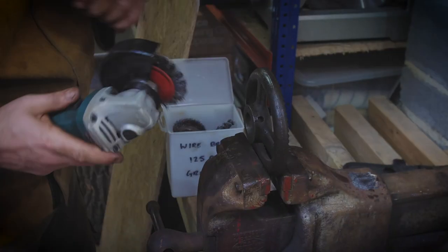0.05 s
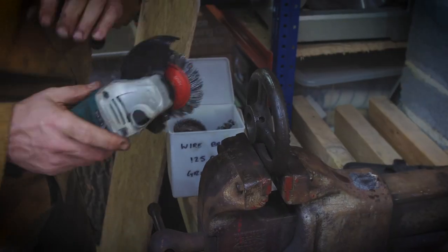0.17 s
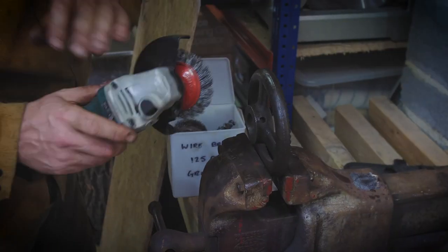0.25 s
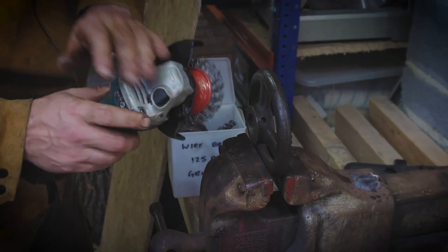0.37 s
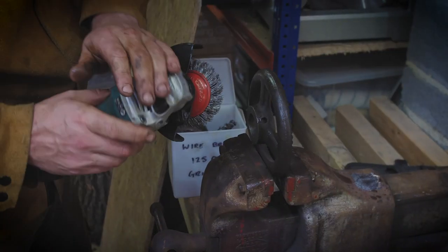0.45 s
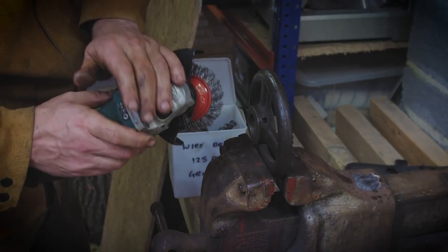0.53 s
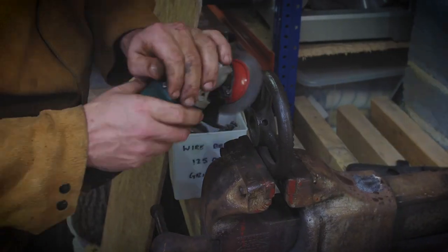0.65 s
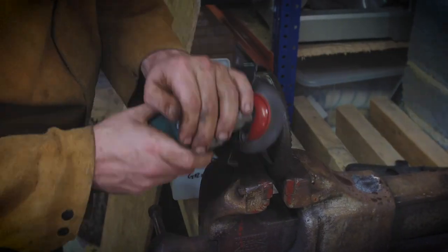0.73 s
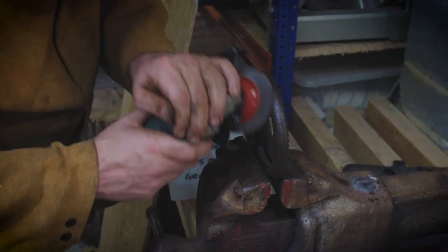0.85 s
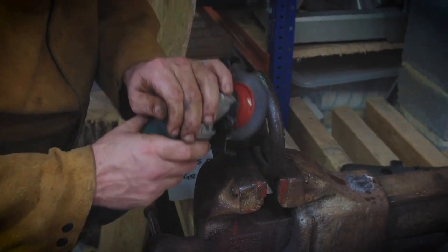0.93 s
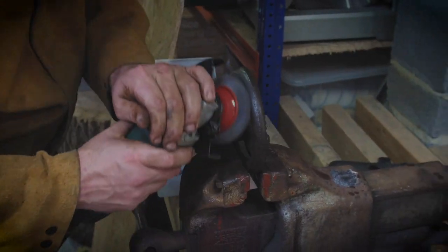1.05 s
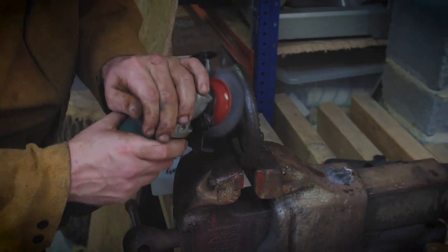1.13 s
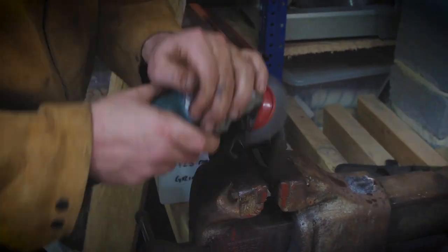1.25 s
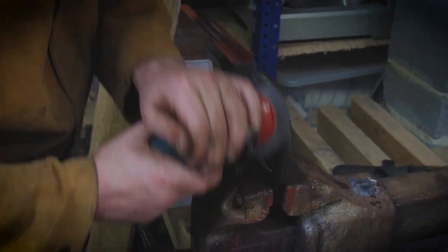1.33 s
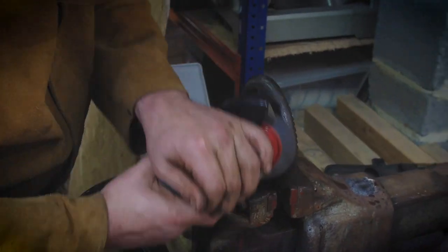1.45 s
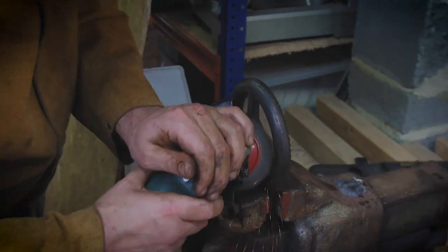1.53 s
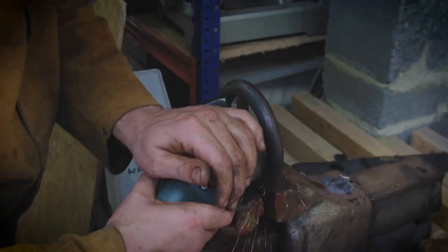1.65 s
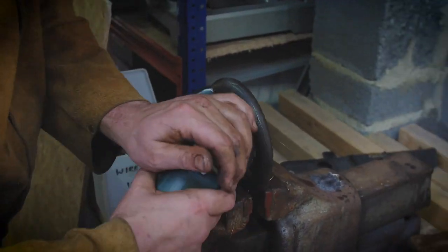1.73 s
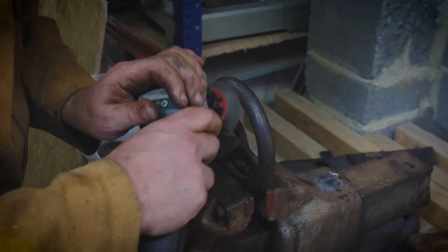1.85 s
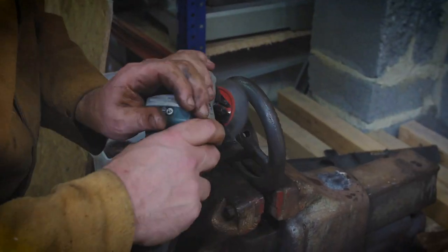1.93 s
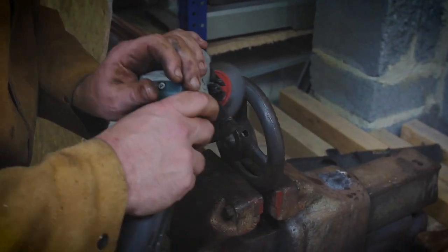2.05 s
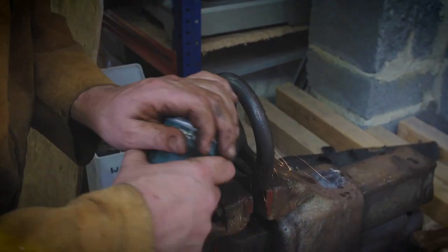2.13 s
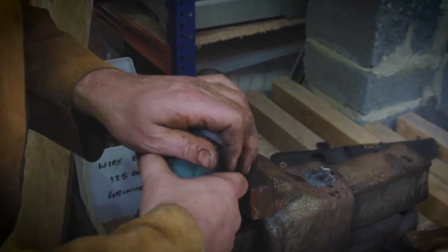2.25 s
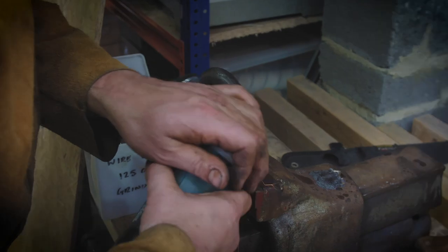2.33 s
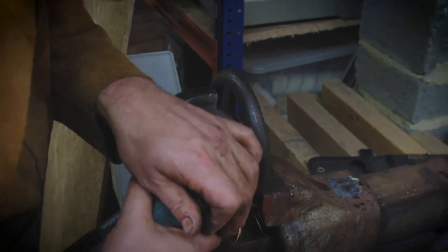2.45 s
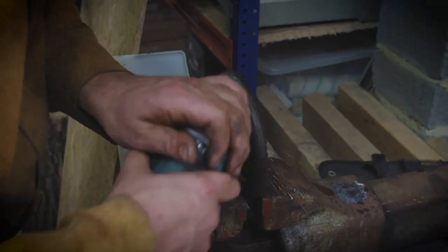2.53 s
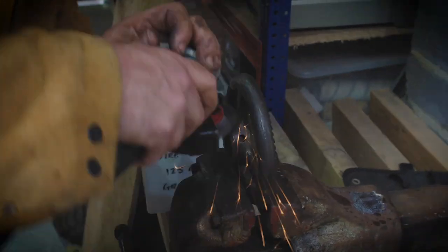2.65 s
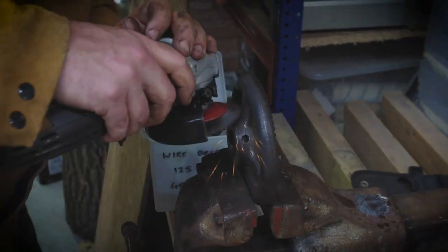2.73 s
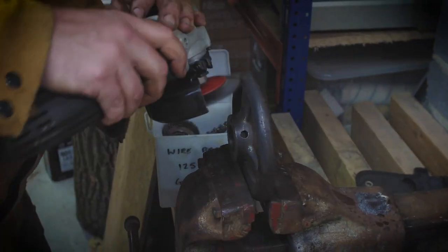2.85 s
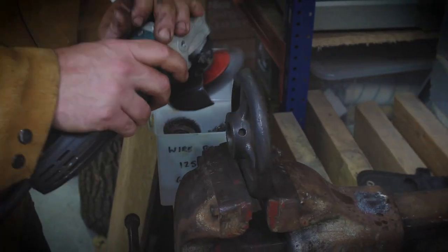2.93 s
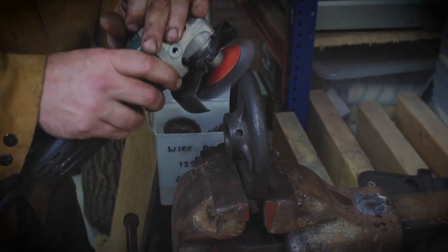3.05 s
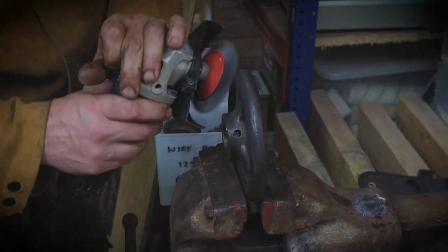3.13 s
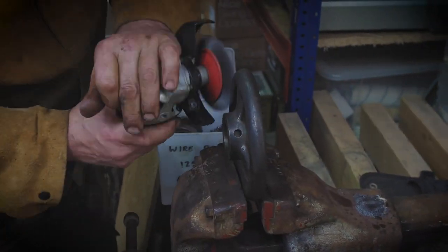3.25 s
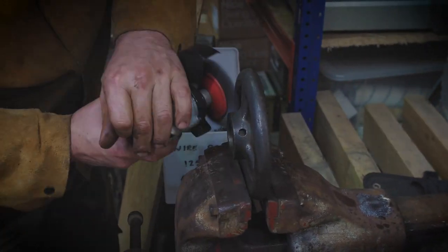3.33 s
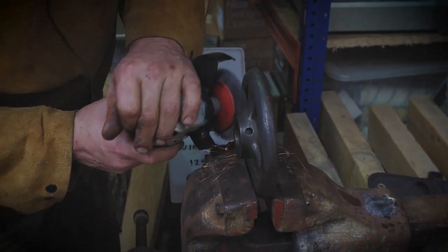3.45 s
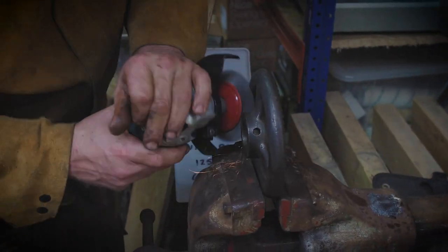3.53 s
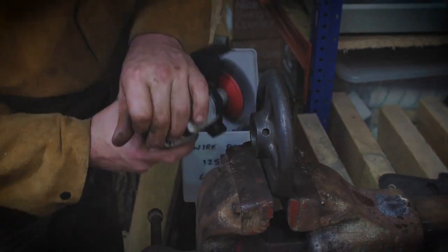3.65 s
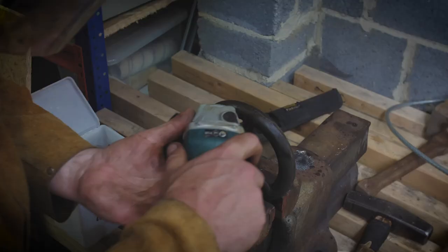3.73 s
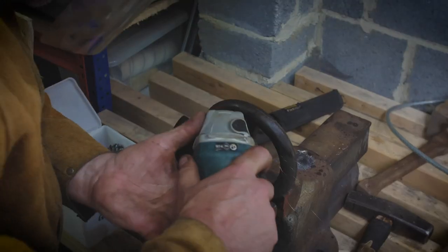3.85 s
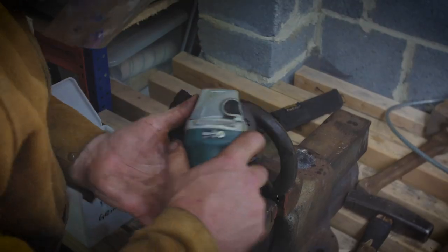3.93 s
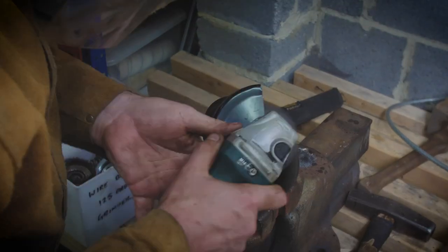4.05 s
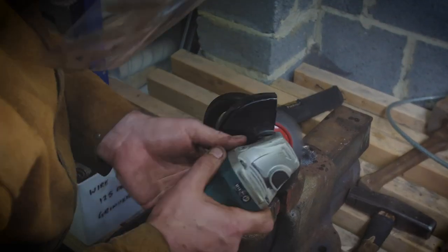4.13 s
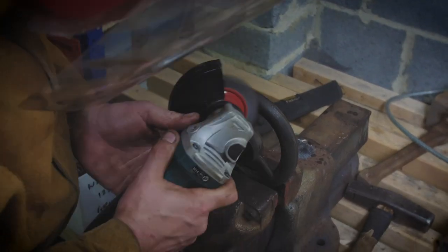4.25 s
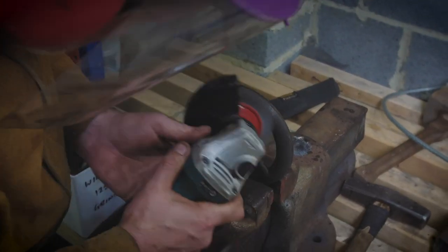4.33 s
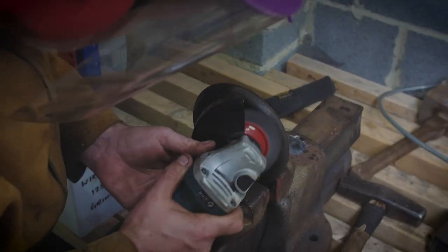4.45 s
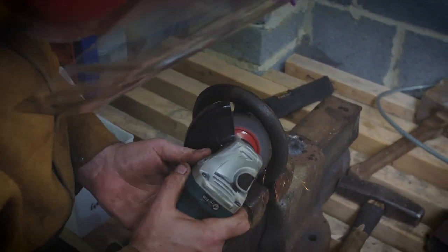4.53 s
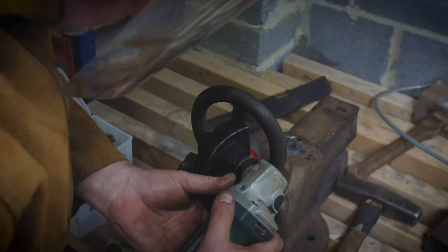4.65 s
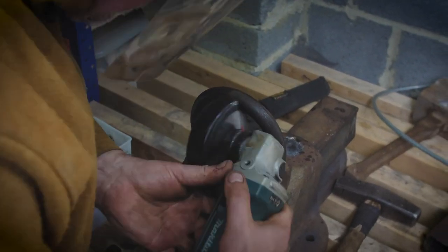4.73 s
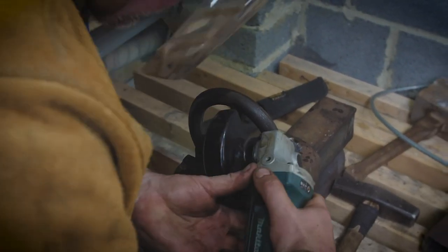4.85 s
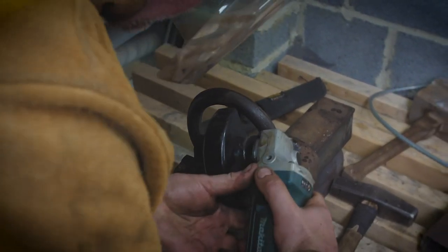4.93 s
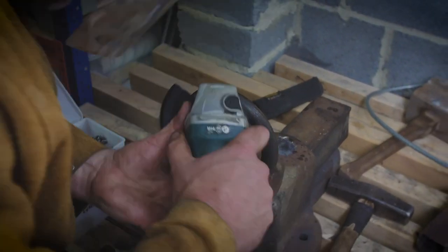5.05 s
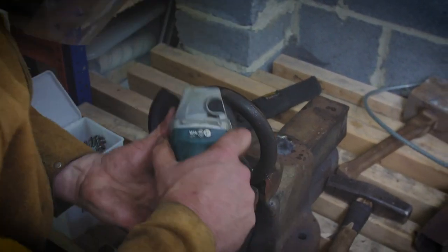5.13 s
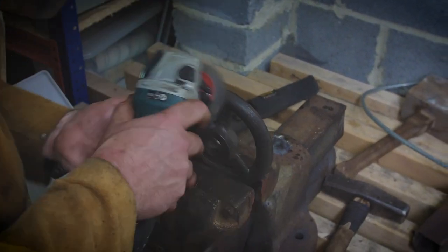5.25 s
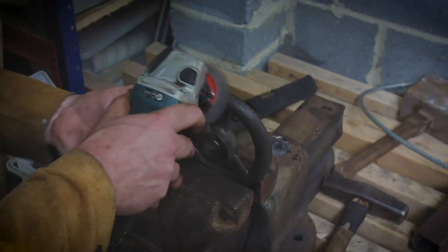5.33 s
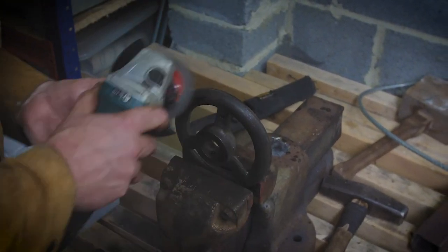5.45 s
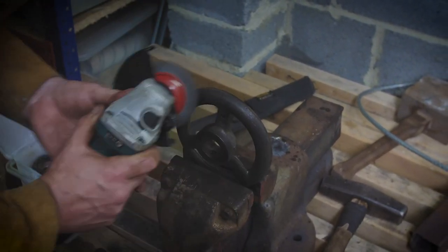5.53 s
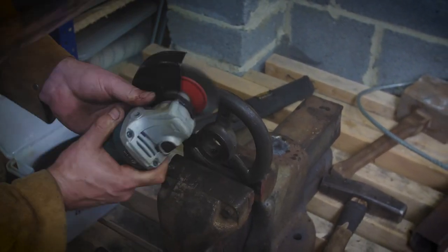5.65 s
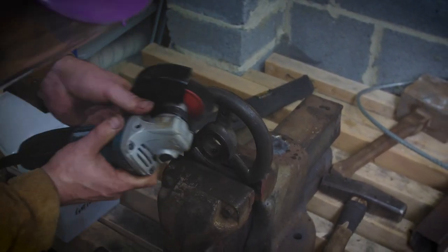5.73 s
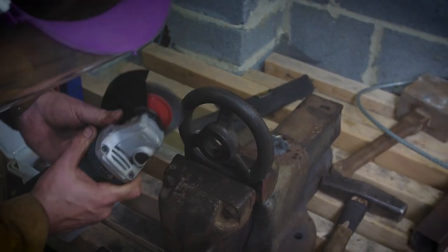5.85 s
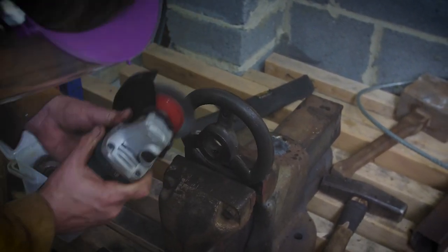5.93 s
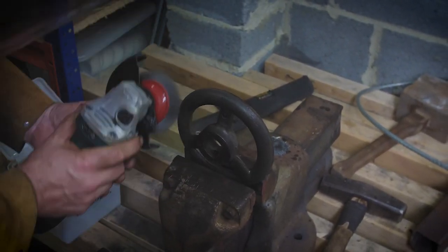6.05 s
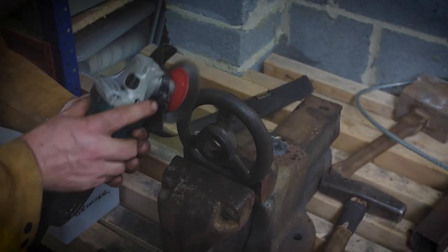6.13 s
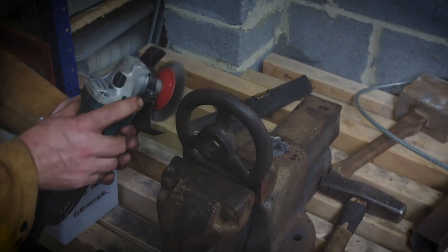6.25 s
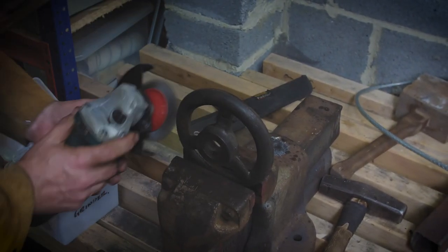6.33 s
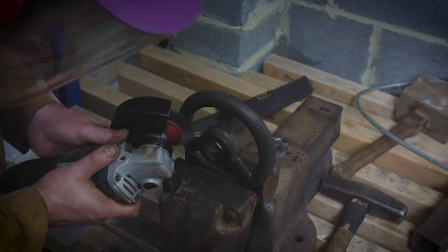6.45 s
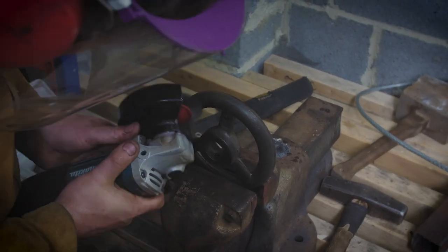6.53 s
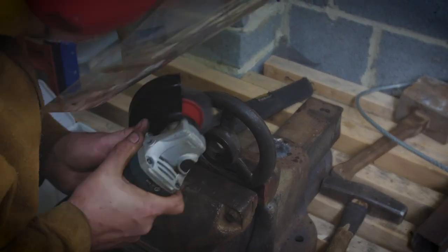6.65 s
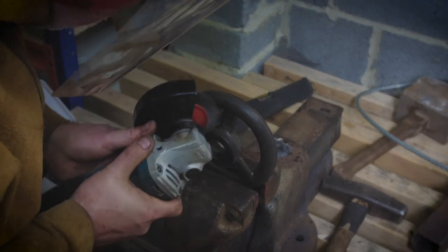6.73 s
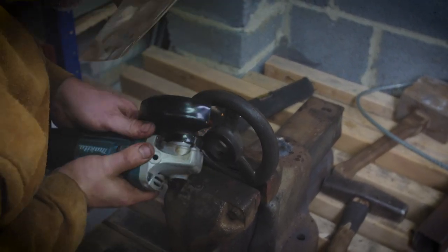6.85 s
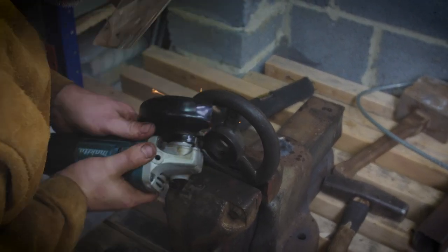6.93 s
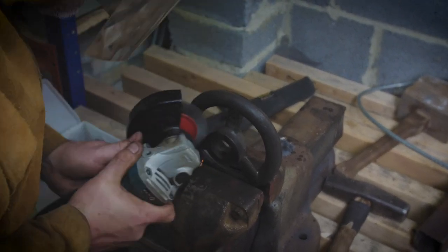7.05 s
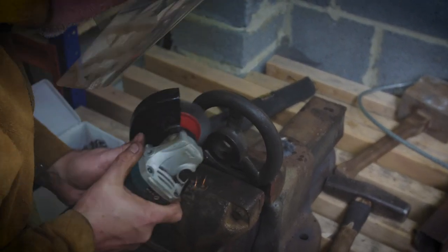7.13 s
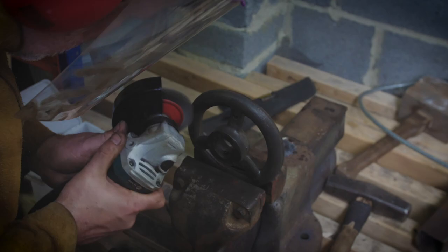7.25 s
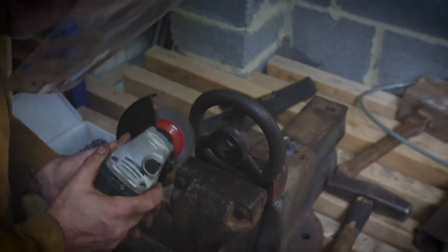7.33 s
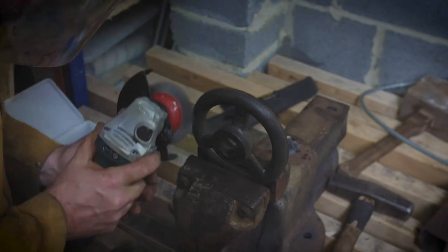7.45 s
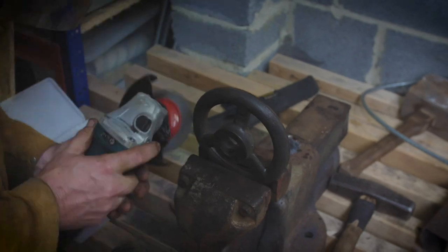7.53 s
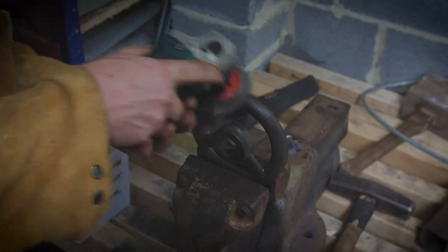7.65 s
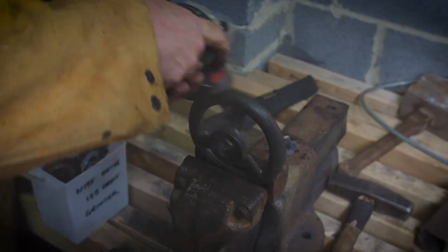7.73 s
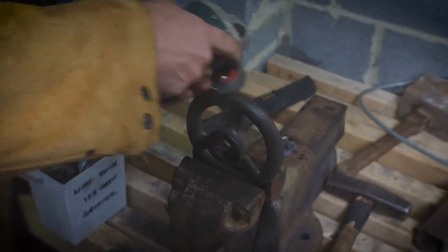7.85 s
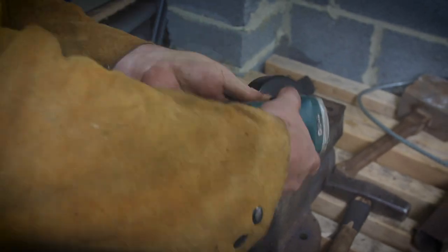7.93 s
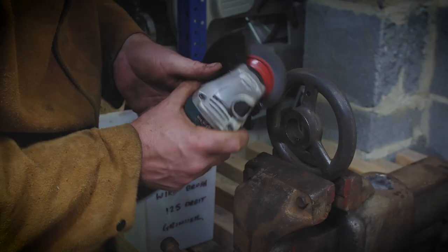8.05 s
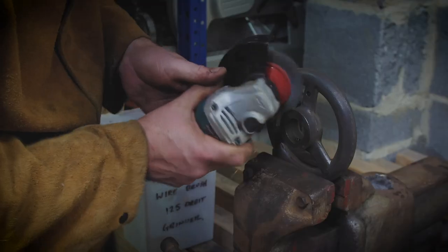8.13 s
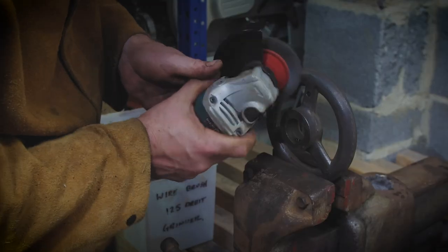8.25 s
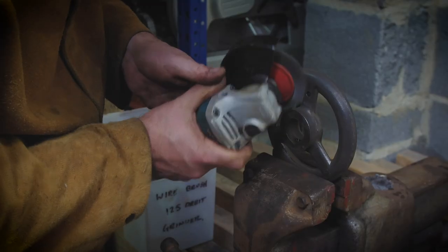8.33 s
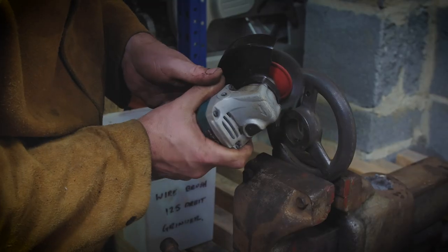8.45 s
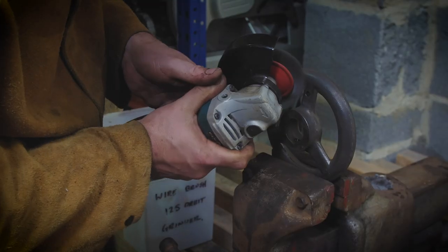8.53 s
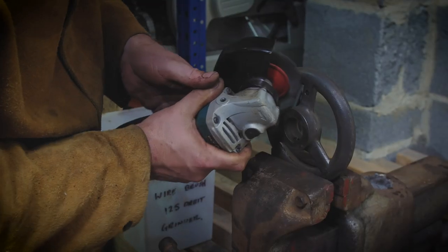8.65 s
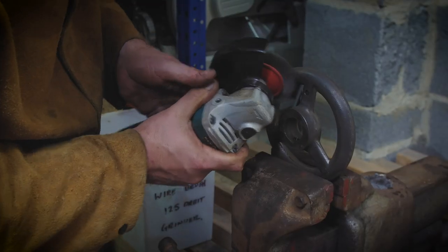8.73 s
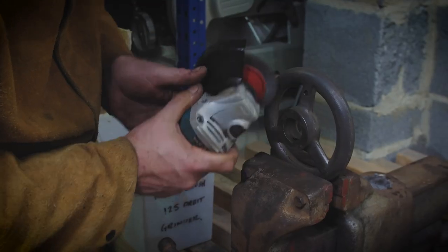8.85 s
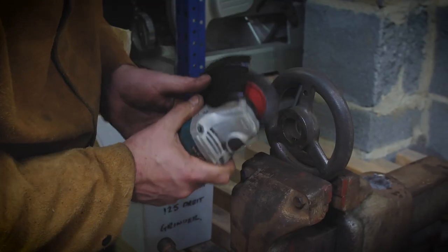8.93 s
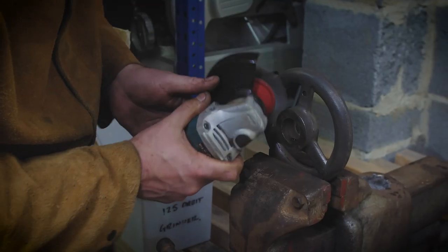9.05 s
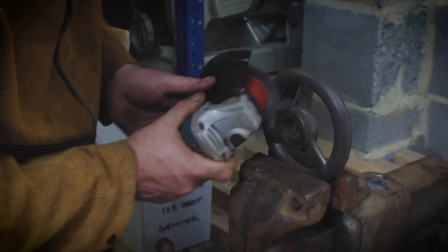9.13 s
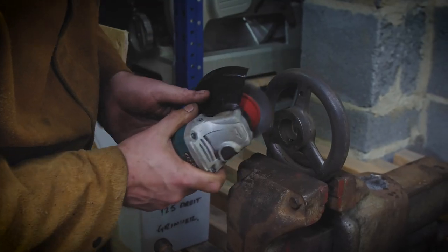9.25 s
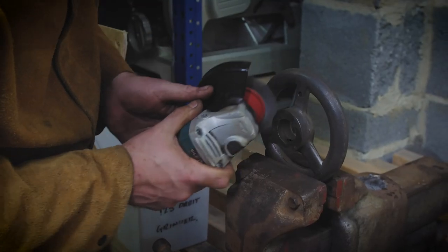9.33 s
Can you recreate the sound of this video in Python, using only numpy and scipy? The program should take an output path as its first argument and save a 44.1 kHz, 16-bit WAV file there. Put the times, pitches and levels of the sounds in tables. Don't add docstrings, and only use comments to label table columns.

```python
import sys
import numpy as np
from scipy import signal
from scipy.fft import rfft, irfft, next_fast_len
from scipy.io import wavfile
from scipy.ndimage import uniform_filter1d, map_coordinates

SR = 44100
rng = np.random.default_rng(int(sys.argv[2]) if len(sys.argv) > 2 else 0)


def boost(x):
    u = np.asarray(x, float) / 20
    return 10 ** u


def unload_wav(signal):
    wavfile.write(
        sys.argv[1],
        SR,
        np.round(np.clip(np.atleast_2d(signal).T, -1, 1) * 32767).astype(np.int16),
    )


N = 413658
T = np.arange(N) / SR
CUT_IN, START, CUT_OUT = .639, .682, 8.1187


def unit(x):
    return x / np.sqrt(np.mean(x ** 2) + 1e-20)


def curves(rows):
    s, *cols = np.transpose(rows)
    return [np.interp(T, s, c) for c in cols]


def wobble(rate):
    return map_coordinates(rng.standard_normal(int(N * rate / SR) + 4), [T * rate])


def coloured(x, points, lo_hz=0, hi_hz=SR):
    size = next_fast_len(N + 8192)
    hz = np.fft.rfftfreq(size, 1 / SR) + 1
    point_hz, point_db = np.transpose(points)
    gain = boost(np.interp(np.log(hz), np.log(point_hz), point_db))
    band = 1 / np.sqrt((1 + (lo_hz / hz) ** 16) * (1 + (hz / hi_hz) ** 16))
    return unit(irfft(rfft(x, size) * gain * band, size)[:N])


def patchy(depth_db, size):
    z = signal.stft(rng.standard_normal(N + 512), nperseg=256)[2]

    def field(frames):
        neighbours = uniform_filter1d(rng.standard_normal(z.shape), 2, 0)
        return unit(uniform_filter1d(neighbours, frames, 1))

    patches = field(size) + 1.2 * field(12 * size)
    return signal.istft(z * boost(depth_db * patches), nperseg=256)[1][:N]


def room_and_sleeve():
    # start_s, sleeve_rub_db, room_hiss_db
    quiet = [
        (0, -62.5, -62),
        (.18, -62, -61),
        (.27, -51.5, -59.5),
        (.44, -56.5, -62.5),
        (.49, -66, -67),
        (.635, -68, -69),
    ]
    cloth = [(18, -61), (30, -38), (113, -6), (312, -4), (432, -8), (662, -8), (1500, -24), (1950, -66),
             (3300, -120)]
    air = [(410, -38), (700, -12), (1180, -1), (3900, -2), (5520, -18), (12700, -23), (15000, -35)]
    rub_db, hiss_db = curves(quiet)
    uneven = boost(1.6 * wobble(38.7)) * rng.standard_normal(N)
    rub = boost(rub_db) * coloured(uneven, cloth)
    hiss = boost(hiss_db) * coloured(patchy(1, size=10), air, hi_hz=12000)
    return rub + hiss


def guard_ticks():
    # start_s, peak_db, bright_db (per octave about 3300 Hz)
    ticks = [
        (0.036, -36.5, -11),
        (0.0836, -29, 9),
        (0.09, -31.5, -3),
        (.1, -37, 0),
        (.147, -29, 16),
        (.278, -36, -1),
    ]
    # pitch_hz, level_db, t60_s (time to fade by 60 dB)
    guard = [
        (1280, -11, 0.027),
        (2200, -0.5, 0.023),
        (3300, 2.5, 0.015),
        (5200, -20, .015),
    ]
    scrape = coloured(rng.standard_normal(N), [(400, -22), (1200, -15), (3000, 7), (5000, -8), (10000, -29)])
    out = np.zeros(N)
    for start_s, peak_db, bright_db in ticks:
        age = np.maximum(T - start_s, 0)
        ring = np.zeros(N)
        for hz, level_db, t60 in guard:
            tilt_db = bright_db * np.log2(hz / 3300)
            tone = np.sin(2 * np.pi * hz * age + 0.6 * wobble(300))
            ring += boost(level_db + tilt_db - 60 * age / t60) * tone
        out += (age > 0) * boost(peak_db - 9.5) * (ring + 0.61 * boost(-60 * age / 0.038) * scrape)
    return out


def creak():
    # start_s, pitch_hz, level_db
    slips = [
        (.27, 700, -85),
        (.3, 699, -62),
        (.37, 700, -58),
        (.39, 447, -58),
        (.45, 432, -57),
        (.49, 420, -85),
    ]
    pitch_hz, level_db = curves(slips)
    turns = 2 * np.pi * np.cumsum(pitch_hz) / SR
    return boost(level_db + 4 * wobble(41.8)) * np.sin(turns + wobble(60))


def handling():
    moves = room_and_sleeve() + creak() + guard_ticks()
    faint = boost(-78) * coloured(rng.standard_normal(N), [(300, -26), (1500, -2), (12000, -13)])
    return moves * (T < CUT_IN) + faint * (T < START)


def bursts(rows, rise, t60):
    start_s, peak_db = np.transpose(rows)
    age = T - start_s[:, None]
    shape = (age > 0) * (1 - np.exp(-abs(age) / rise)) * boost(-60 * abs(age) / t60)
    return boost(peak_db) @ shape


def switch_clicks():
    # start_s, peak_db
    snaps = [
        (.655, -68),
        (.6605, -59),
        (.678, -41),
    ]
    noise = coloured(rng.standard_normal(N), [(300, -20), (3000, 0), (12000, -4)])
    return bursts(snaps, rise=.0003, t60=0.025) * noise


def grinder(wheel_hz, levels_db, parts, rasp, colour, edges_hz, shake, pace, flicker_db, beat, grit_db, patch_db,
            size):
    wheel_hz = wheel_hz * (1 + shake * (wobble(pace) + .6 * wobble(2 * pace)))
    turns = 2 * np.pi * np.cumsum(wheel_hz) / SR
    out = np.zeros(N)
    for part, level_db in zip(parts, levels_db):
        together = wobble(pace)
        for order, db in part:
            audible = order * wheel_hz < .48 * SR
            depth_db = flicker_db * np.clip(order / 10, .68, 1)
            beads = depth_db * (together + .5 * wobble(pace / 2) + .8 * wobble(2 * pace))
            sway = rng.uniform(0, 2 * np.pi) + .5 * wobble(2 * pace)
            out += audible * boost(level_db + db + 3.5 + beads) * np.sin(order * turns + sway)
    tremor_db = 0.27 * wobble(20) + 0.42 * wobble(60)
    contact = unit(boost(tremor_db + grit_db * wobble(3000)) * (1 + beat * np.cos(turns)))
    for level_db, lo_hz, hi_hz in zip(curves(rasp), edges_hz, edges_hz[1:]):
        wires = coloured(contact * patchy(patch_db, size), colour, lo_hz, hi_hz)
        out += boost(level_db + 0.53 * wobble(25)) * wires
    return out


def hurried_grinder():
    # start_s, wheel_turns_hz
    speed = [(0.68, 377.5), (0.72, 536), (0.77, 752), (0.802, 803), (0.829, 839.2), (0.965, 861),
             (1.128, 863.5), (1.245, 855), (1.292, 820.3), (1.321, 802), (1.36, 832), (1.455, 830),
             (1.618, 873), (1.738, 826), (1.781, 763), (1.863, 679), (1.945, 752), (2.01, 839),
             (2.108, 802), (2.143, 792), (2.217, 867), (2.271, 809.8), (2.434, 783), (2.598, 786),
             (2.761, 798), (2.924, 767), (2.968, 835), (3.087, 821), (3.131, 774), (3.251, 784.8),
             (3.414, 785), (3.517, 807), (3.577, 777), (3.648, 738), (3.694, 746.4), (3.741, 820),
             (3.765, 850.1), (3.814, 773), (3.904, 765), (3.956, 725), (3.999, 782.7), (4.067, 816),
             (4.195, 760), (4.23, 784), (4.271, 739), (4.394, 752.6), (4.557, 814.8), (4.72, 814),
             (4.772, 754.7), (4.883, 772), (4.905, 735.5), (5.047, 711), (5.177, 770), (5.21, 758),
             (5.273, 792.2), (5.373, 709), (5.536, 705), (5.7, 699.5), (5.863, 683), (6.026, 693),
             (6.19, 723.5), (6.353, 713), (6.402, 724), (6.451, 808), (6.516, 840), (6.595, 720),
             (6.679, 662), (6.723, 604), (6.785, 653), (6.843, 639), (6.889, 684), (7.006, 660.9),
             (7.09, 654), (7.131, 703), (7.169, 668), (7.332, 736), (7.425, 823), (7.496, 786),
             (7.659, 777), (7.724, 745), (7.773, 820), (7.822, 779.2), (7.877, 812.1), (7.985, 757),
             (8.034, 800), (8.064, 766), (8.116, 745)]
    # start_s, unbalance_db, oval_db, third_order_db, armature_db, guard_edge_db, cooling_fan_db, knots_db
    levels = [(0.69, -91, -80, -58, -57, -60.0, -57, -55), (0.76, -64, -49, -50, -43, -57.0, -36, -56),
              (0.85, -54.0, -61, -52, -50, -63, -36, -38), (1.01, -53, -54, -50.0, -49, -60, -38, -40.0),
              (1.18, -46, -50.0, -46.5, -52.0, -58, -33, -39.0), (1.34, -65, -55, -53, -48, -62, -39, -37),
              (1.51, -54.5, -52.5, -46.5, -50, -57, -38, -45), (1.67, -55, -52, -59, -47, -59, -32, -36),
              (1.84, -62.5, -64, -44.5, -49, -50.0, -49, -48), (2.0, -49, -52.5, -48, -45, -56, -38, -54),
              (2.17, -56.5, -60, -54.0, -46.5, -64, -32, -41),
              (2.33, -57.0, -61, -51.5, -46, -64, -44, -60), (2.5, -62, -56, -45.5, -45.5, -47.5, -46, -35),
              (2.66, -52, -57, -45, -47, -49, -38, -37), (2.83, -59.5, -63, -51.5, -49, -57.0, -42, -44),
              (2.99, -52.5, -56.0, -48, -50, -57, -36, -43), (3.16, -60, -62, -45, -62, -61, -44, -40.5),
              (3.32, -51, -51, -56, -51, -53, -44, -33.5), (3.49, -57.0, -49.5, -50, -48.5, -58, -61, -34),
              (3.65, -57, -52, -57, -51, -56, -43, -39.0), (3.82, -63, -50, -54, -43, -44, -39, -40.0),
              (3.98, -59.5, -76, -58, -47, -47, -35.5, -53),
              (4.15, -54, -54, -53, -44.5, -51, -47.0, -49.0), (4.31, -63, -68, -49, -50, -48, -51, -46),
              (4.48, -58, -61, -48.5, -46, -44, -46, -48), (4.64, -55.5, -56.0, -56, -48, -50, -40, -40),
              (4.81, -55, -59, -53, -48.5, -46, -45, -35), (4.97, -61.5, -65, -54, -45, -68, -39.0, -44.5),
              (5.14, -62, -67.0, -50, -54, -50.0, -45, -51), (5.3, -59, -68.5, -47, -43, -47, -54, -39.0),
              (5.47, -58, -54, -48, -63, -61.0, -64, -35), (5.63, -62, -68, -57.0, -58, -53, -61, -37),
              (5.8, -52.5, -58, -57, -47.5, -60.5, -39, -41.5),
              (5.96, -53.0, -58, -64, -55.5, -38.5, -51.0, -41), (6.13, -59, -69, -58, -54, -44, -54, -39),
              (6.29, -69, -61, -61, -63, -60, -49, -40), (6.46, -54.0, -65.0, -59, -54.0, -46, -49.0, -39),
              (6.62, -58.5, -51, -45.5, -49.0, -43, -42, -40),
              (6.79, -54.5, -64, -52, -55, -47, -40.0, -43),
              (6.95, -59, -59.0, -52.0, -57, -53, -42, -48.0),
              (7.12, -56.0, -67, -52, -53.0, -43.5, -42, -47),
              (7.28, -55.5, -61.0, -55, -49, -45, -41, -45),
              (7.45, -67.0, -59.0, -62, -49, -47.0, -46.0, -41.0),
              (7.61, -54, -79, -60, -48.0, -40, -46, -41), (7.78, -62, -69, -50, -42.5, -66, -40, -46.0),
              (7.94, -56, -60, -53, -42.5, -56.0, -48, -42),
              (8.1, -52.5, -72, -66.0, -42.5, -59.0, -42, -49.0)]
    # multiple of the wheel speed, level_db
    parts = [
        [(1, 0)],
        [(2, 0)],
        [(3, 0), (4, -6), (5, -7), (6, -6)],
        [(3.7, 0), (5.7, -9)],
        [(7, -2), (8, -5)],
        [(14.8, 0), (11.1, -9)],
        [(18, 0), (16, -8), (17, -4), (19, -6), (20, -5), (21, -7), (22, -7)],
    ]
    rasp = [(0.7, -43.5, -38.5, -30, -25.5), (0.91, -45.5, -40.5, -31, -25.5),
            (1.12, -43.5, -41, -30, -25.5), (1.33, -47.5, -39.5, -32.5, -24.5),
            (1.55, -41.5, -37.5, -30.5, -26), (1.76, -45, -37.5, -33.5, -25),
            (1.97, -44.5, -35.5, -31.5, -25.5), (2.18, -44.5, -37, -34.5, -24.5),
            (2.39, -46.5, -39.5, -34.5, -27), (2.6, -46.5, -38.0, -34.5, -30),
            (2.81, -45.0, -42, -35, -24.5), (3.029, -45.5, -40, -35, -24.5),
            (3.24, -46.5, -44.5, -34, -27.5), (3.45, -44.5, -42.5, -34.5, -27.5),
            (3.66, -43.5, -42.0, -33.5, -28), (3.869, -45.0, -39, -32, -27), (4.08, -46, -40, -33.5, -27),
            (4.29, -48, -42, -34, -27), (4.51, -43, -39.5, -32.5, -28), (4.719, -42.5, -41.5, -33, -32.5),
            (4.93, -47, -49, -33, -30), (5.14, -46.0, -38, -31.5, -26), (5.349, -46.5, -38, -32.5, -32.5),
            (5.56, -49, -38.5, -36, -34), (5.77, -48.0, -44, -35, -29.5), (5.99, -45.5, -42, -34.5, -37.5),
            (6.2, -49, -43, -33.5, -27.5), (6.411, -46.5, -41.5, -33, -37), (6.62, -45, -43, -35.5, -29),
            (6.83, -45.0, -42, -35.5, -29), (7.04, -45, -43.5, -37, -28), (7.25, -46.5, -42, -33.5, -31),
            (7.47, -43, -39.5, -32.5, -32.0), (7.679, -48, -40, -34, -28.5), (7.89, -46.5, -40, -32.5, -30),
            (8.1, -47, -41, -34, -29)]
    colour = [(120, -95), (200, -65.5), (758, -18), (1550, -16.5), (2870, -11), (3450, -9), (3920, -2.5),
              (5160, -4.5), (6900, -1.5), (8750, -1.5), (12200, 2), (15700, 0.5)]
    return grinder(*curves(speed), curves(levels), parts, rasp, colour, edges_hz=(0, 3400, 6000, 10500, SR),
                   shake=.007, pace=40, flicker_db=3.6, beat=.25, grit_db=1, patch_db=1, size=12)


def snag_thuds():
    # start_s, peak_db
    snags = [(1.336, -33), (1.602, -32.5), (3.059, -39), (3.769, -43), (4.122, -34.5), (4.212, -34),
             (4.468, -37), (4.637, -32.5), (4.796, -39.5), (5.489, -32.5), (7.381, -37.5), (7.735, -36),
             (8.009, -36)]
    thud = [(150, -70), (300, -37), (500, -2.5), (800, 6.5), (1600, 4), (3000, 4), (6000, -30)]
    jolts = bursts(snags, rise=.009, t60=.12) * rng.standard_normal(N)
    return boost(1) * np.std(jolts) * coloured(jolts, thud)


def hurried():
    tool = hurried_grinder() * np.clip((T - START) / 0.0032, 0, 1)
    return (tool + snag_thuds() + switch_clicks()) * (T < CUT_OUT)


def true_speed():
    # start_s, wheel_turns_hz, unbalance_db, cooling_fan_db, knots_db, gear_mesh_db, whistle_db
    levels = [(8.14, 132.8, -68, -48, -59, -38, -53), (8.208, 134.4, -57.5, -41.5, -41, -37, -46),
              (8.421, 131.65, -54.5, -37, -42, -38.5, -49), (8.489, 132.8, -58.5, -40, -38, -42, -50),
              (8.616, 127.8, -53, -39, -41, -44, -43), (8.675, 127.6, -55.0, -40, -37, -36, -42.0),
              (8.757, 121.6, -58, -37, -46, -42.0, -52), (8.807, 121, -55, -39.0, -36, -39, -48),
              (8.875, 120.9, -54.0, -37, -50, -33, -57.0), (8.929, 123.6, -59, -50, -70, -38.5, -48),
              (9.124, 135.9, -56.5, -44, -47, -46.0, -51), (9.179, 134.8, -55, -35, -32, -39, -47),
              (9.215, 131.2, -55, -43, -49, -46.0, -49), (9.242, 132.8, -58, -44, -47, -40, -55),
              (9.278, 132.6, -56, -54.5, -55, -36.5, -57.0), (9.383, 136.7, -62, -33, -46, -39, -63.0)]
    # multiple of the wheel speed, level_db
    parts = [
        [(1, -1), (2, -5), (3, 2), (3.7, 3.5), (7, 0)],
        [(14.8, -0.5), (25.9, -3), (29.6, -2.5)],
        [(17.37, 1), (15.9, -24), (16.8, -13), (19, -10), (20.2, -28), (20.6, -4)],
        [(37, -2), (32.3, -6), (33.3, -4), (36, -8), (38, -8), (40.7, -12), (48.1, -16), (51.8, -18), (74, -26)],
        [(114.7, 0)],
    ]
    # start_s, then level_db of the low, middle and high rasp
    rasp = [
        (8.145, -41, -26.5, -44),
        (8.157, -36.5, -26.5, -39),
        (9.38, -35, -27.5, -38),
    ]
    colour = [(24, -84), (40, -67), (123, -25), (179, -23), (611, -14), (1230, -3), (1660, -8.5), (3110, 2),
              (5670, -12), (10300, -19), (15800, -27.5)]
    wheel_hz, *levels_db = curves(levels)
    tool = grinder(wheel_hz, levels_db, parts, rasp, colour, edges_hz=(0, 1500, 5500, SR),
                   shake=.0012, pace=24, flicker_db=3, beat=.15, grit_db=1.2, patch_db=.7, size=20)
    return tool * np.clip((T - CUT_OUT) / 0.029, 0, 1) ** 2


def scene():
    mono = handling() + hurried() + true_speed()
    return np.array([mono, mono])


def band_limit(x):
    return signal.sosfilt(signal.butter(12, 16930, fs=SR, output="sos"), x)


def record(dry):
    hz, t, z = signal.stft(dry[0], SR, nperseg=1024)
    when, low, wide = rng.uniform(size=(32, 3)).T[:, :, None]
    frames = abs(t - .8 - 8.5 * when) < .014
    bands = (hz > 4200 + 9500 * low) & (hz < 6000 + 9500 * low + 1500 * wide)
    opening = ((hz > 4500) & (hz < 12000))[:, None] * (t < CUT_IN)
    swapped = (bands.T @ frames) + boost(-16) * opening
    random_phase = np.exp(2j * np.pi * rng.uniform(size=z.shape))
    side = signal.istft(swapped * abs(z) * random_phase, SR, nperseg=1024)[1][:N]
    wet = dry + boost(-2) * np.array([side, -side])
    size = next_fast_len(N)
    below_top = (15800 - np.fft.rfftfreq(size, 1 / SR)) / 80
    edge = np.sin(np.pi / 2 * np.clip(below_top, 0, 1)) ** 2
    wet = irfft(rfft(wet, size) * edge, size)[:, :N]
    return band_limit(wet)


dry = scene()
out = record(dry)
unload_wav(out)
```